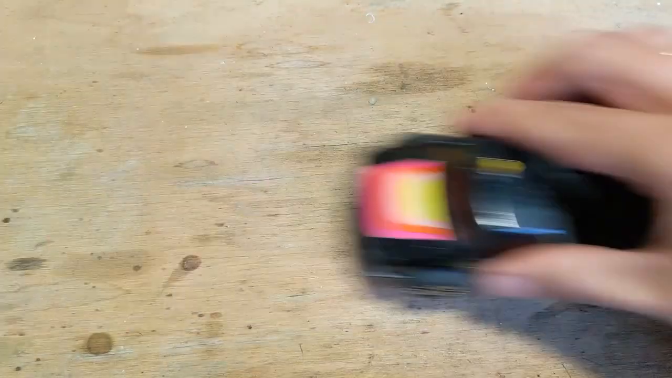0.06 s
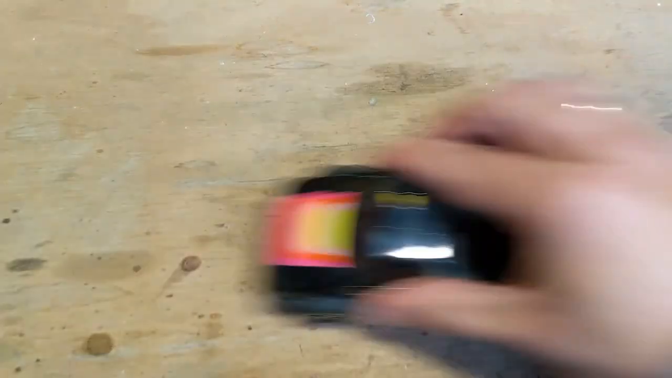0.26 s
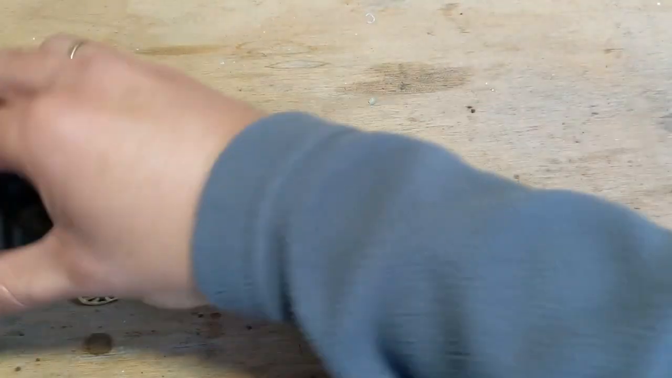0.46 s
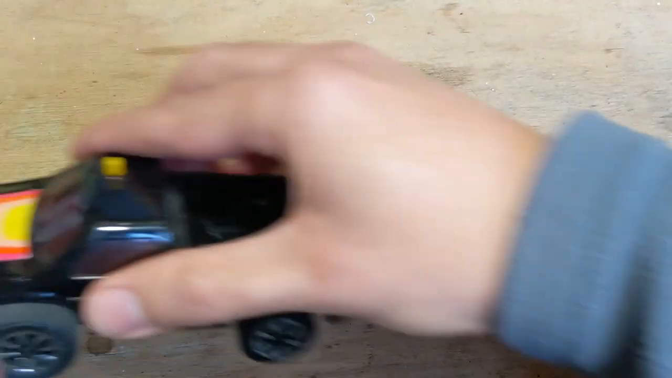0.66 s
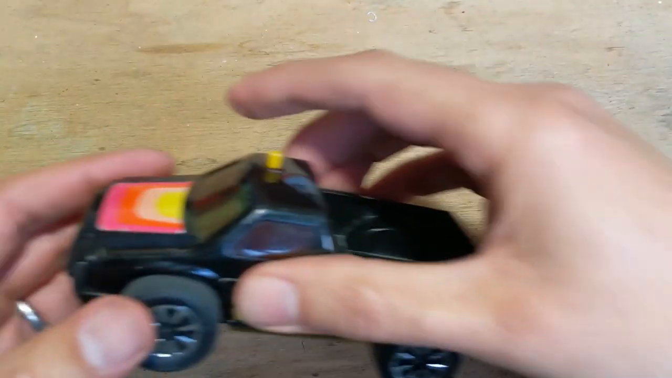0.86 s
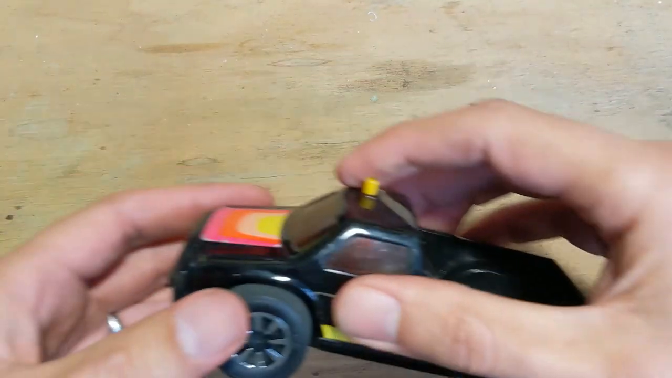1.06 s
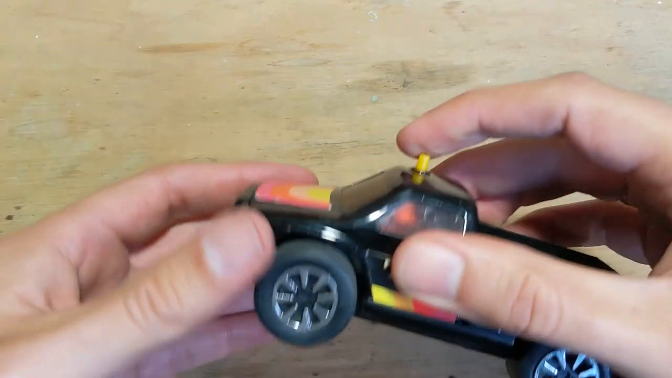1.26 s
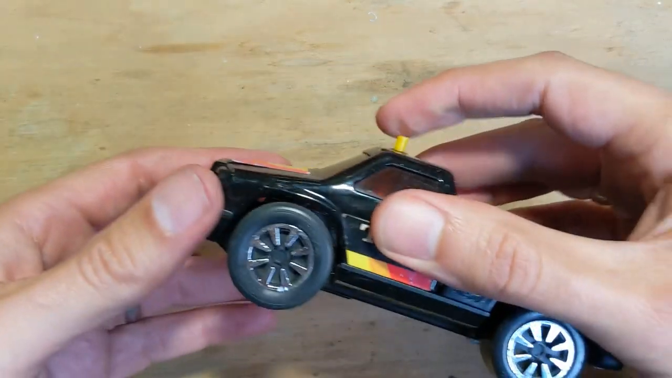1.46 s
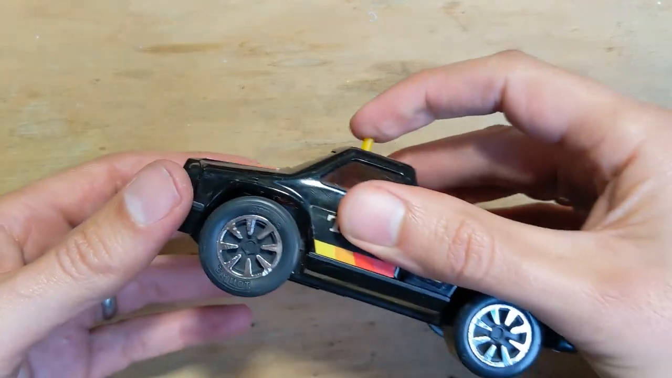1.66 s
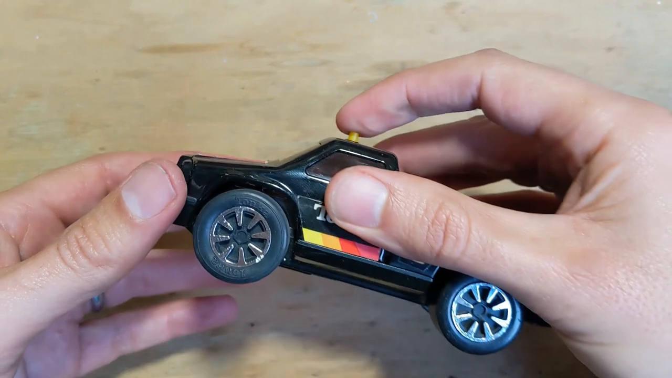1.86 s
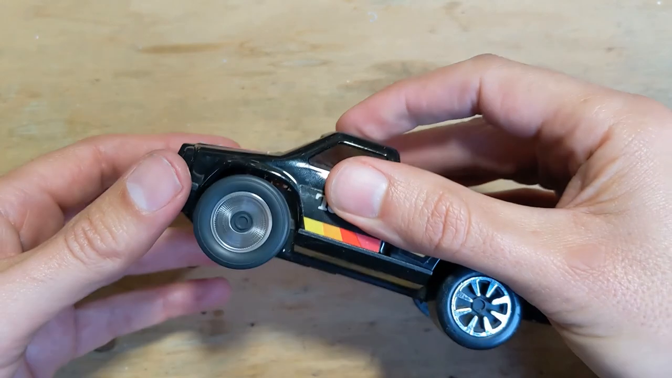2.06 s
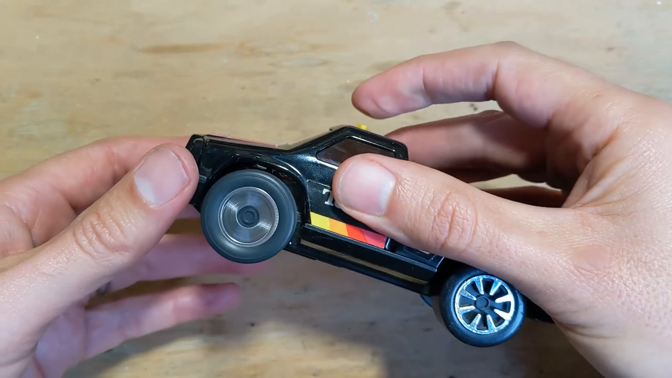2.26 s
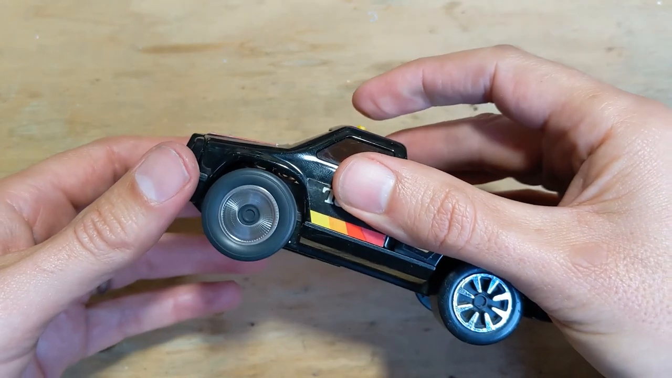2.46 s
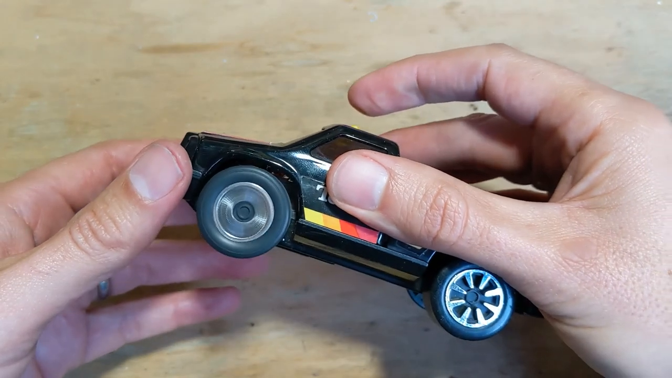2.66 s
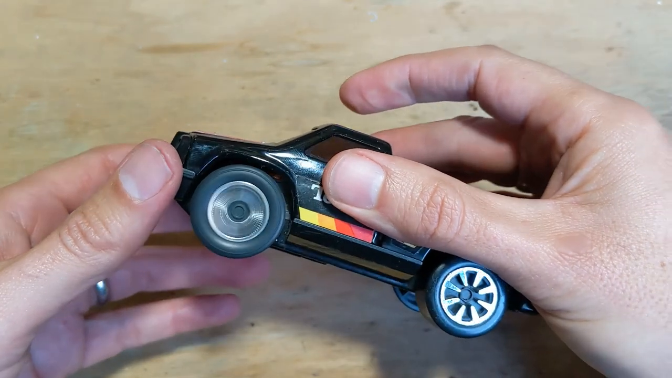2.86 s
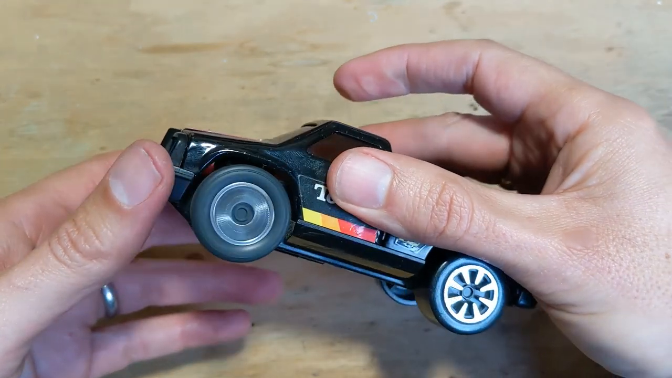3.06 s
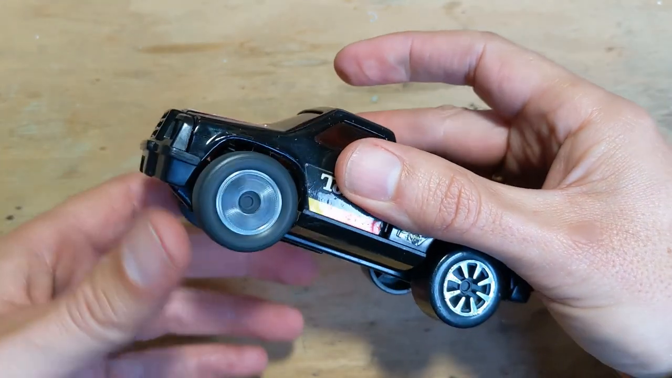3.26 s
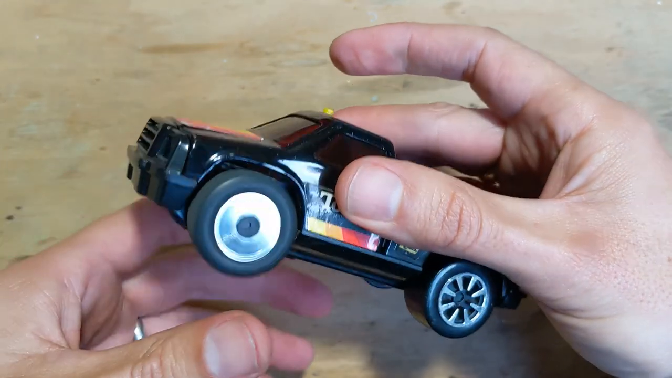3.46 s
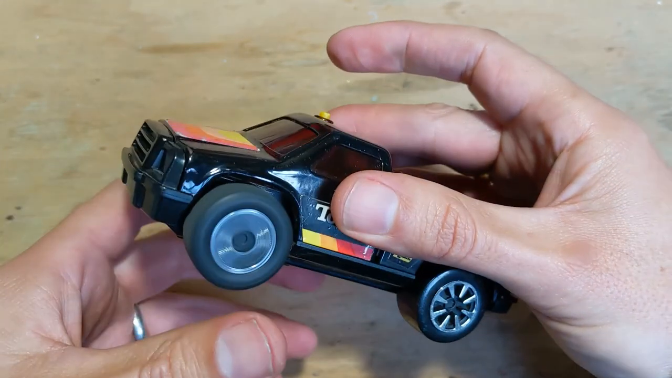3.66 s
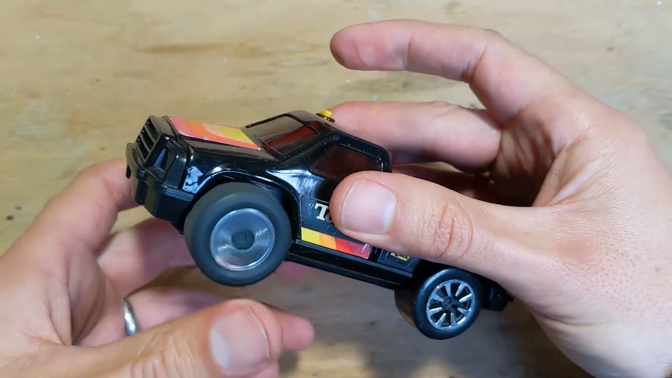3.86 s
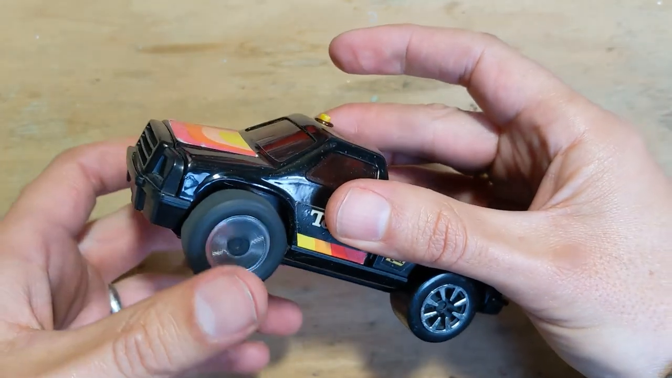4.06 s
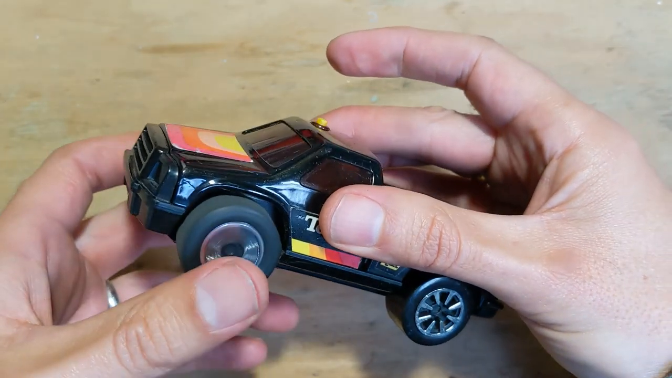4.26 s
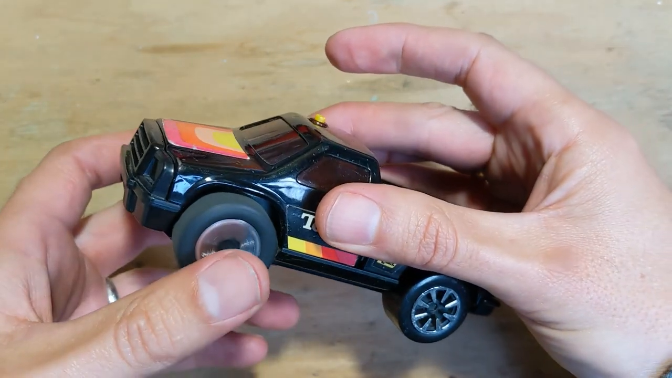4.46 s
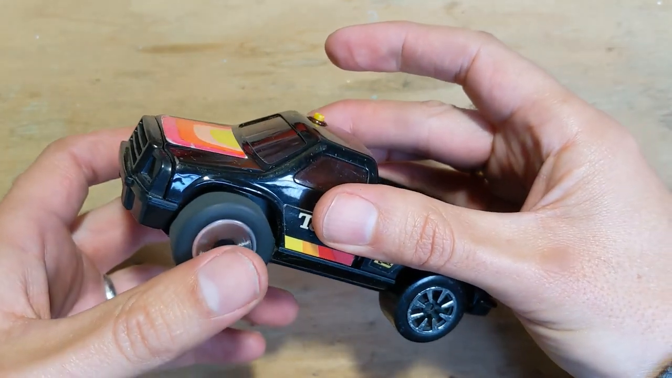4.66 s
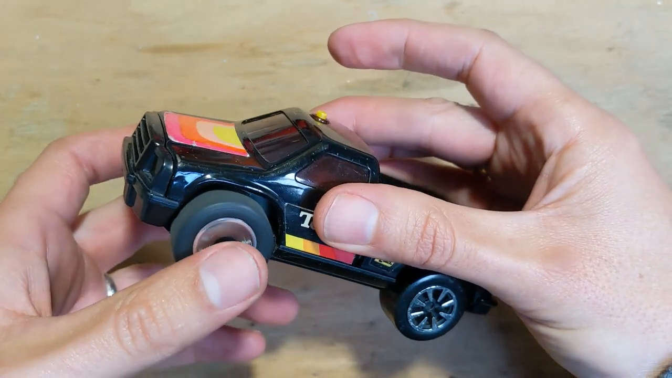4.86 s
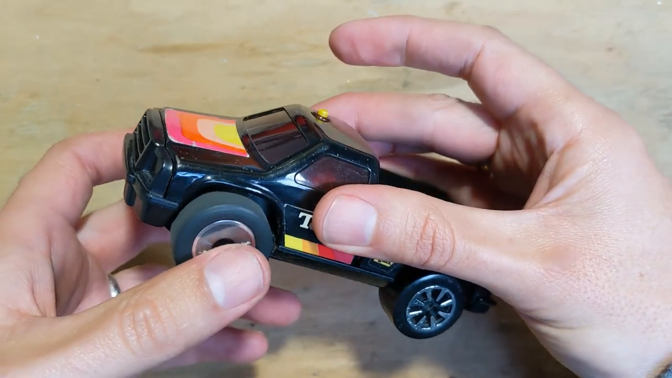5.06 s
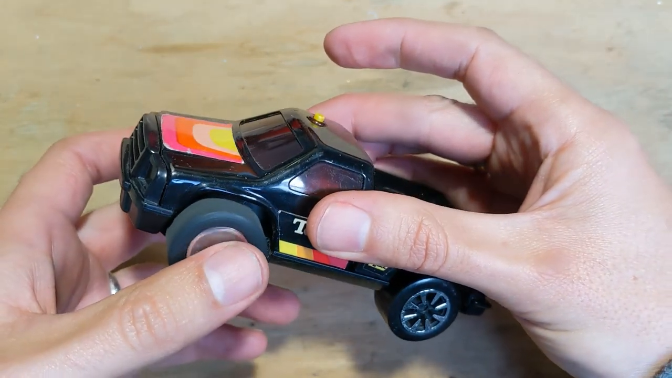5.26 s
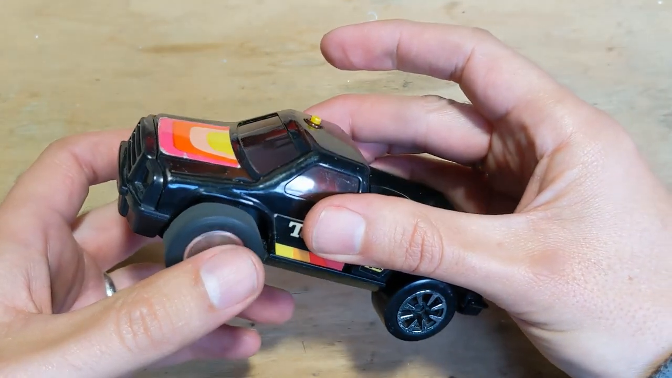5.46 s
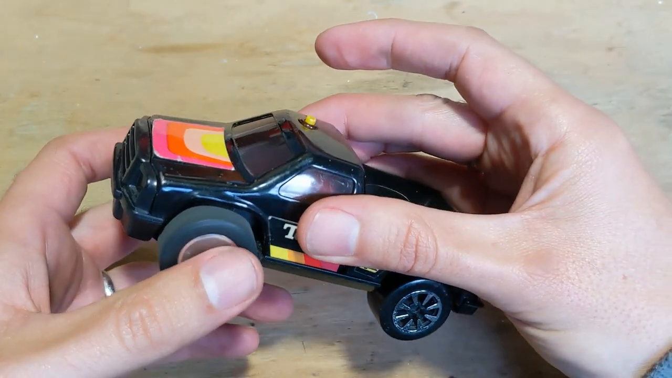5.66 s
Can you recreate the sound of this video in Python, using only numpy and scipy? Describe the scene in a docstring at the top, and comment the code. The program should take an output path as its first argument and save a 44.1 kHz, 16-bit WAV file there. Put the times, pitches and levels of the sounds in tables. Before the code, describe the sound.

A small toy car rattles, clacks onto a wooden bench and scrapes along briefly, then its gears catch into a loud, harsh whine sinking in pitch.

```python
"""A dry rattle opens: a toy flywheel car, its flywheel coasting, is set down on a wooden bench, pushed, lifted.
Then the gears catch: the teeth whine and chatter in the plastic shell, falling in pitch as the flywheel slows.
A thumb on the spinning wheel makes the whine louder and drags it down faster.
Random impacts excite resonant filters (rattle, chatter, knocks, wood); phase-locked sines give the gear tones.
Delayed and scattered copies spread the sound over two ports, above a low rumble and a quiet room."""
import sys
import numpy as np
from scipy import signal
from scipy.fft import rfft, irfft
from scipy.io import wavfile

SR = 44100
rng = np.random.default_rng(int(sys.argv[2]) if len(sys.argv) > 2 else 0)


def to_wav(s):
    """Save 16-bit WAV."""
    ch = np.atleast_2d(s).T  # columns
    pcm = np.round(np.clip(ch, -1, 1) * 32767)  # PCM
    wavfile.write(sys.argv[1], SR, pcm.astype(np.int16))


N = 251766
TIME = np.arange(N) / SR
TAPS = 4096  # length of the colouring filters
FREQS = np.fft.rfftfreq(TAPS, 1 / SR)
EDGE_HZ = 15900  # upper edge of the band
# the gears catch, then spin up to their top tooth rate
CATCH_S, SPIN_FROM_S, SPIN_UP_S, TOP_HZ = 2.08, 2.102, 0.08, 3256
SPUN_S = SPIN_FROM_S + SPIN_UP_S

# the wheels landing on the bench: t/s, level/dB, 60 dB decay time/s, dullness corner f/Hz
LANDINGS = [(0.2406, -15.5, 0.17, 1300), (0.2836, -8.5, 0.056, 2000), (0.2872, -6.5, 0.079, 5000),
            (0.301, -18.5, 0.2, 4000)]
# a thumb brakes the spinning wheel and loads the teeth: t/s, pressure/1
THUMB = [(4.17, 0), (5.12, .6), (5.25, 1), (5.38, .8)]
TOUCH_S = THUMB[0][0]


def amp(db):
    """Decibels to amplitude gain: 20 dB for each factor of ten."""
    return 10 ** (np.asarray(db) / 20)


def unit(x):
    """Scales to rms 1."""
    return x / np.sqrt(np.mean(x ** 2) + 1e-20)


def ramp(start_s, length_s):
    """Linear rise from 0 to 1, then steady."""
    return np.clip((TIME - start_s) / length_s, 0, 1)


def curve(rows, column=1):
    """Linear interpolation of one column of a time table at every sample."""
    rows = np.asarray(rows)
    return np.interp(TIME, rows[:, 0], rows[:, column])


def spectrum(rows, column=1):
    """Interpolation of one column of a frequency table on a logarithmic axis."""
    rows = np.asarray(rows)
    return np.interp(np.log(FREQS + 1), np.log(rows[:, 0]), rows[:, column])


def resonance(hz, centre_hz, width_hz):
    """Lorentzian resonance curve: 1 at the centre, one half at half the width to either side."""
    return 1 / (1 + (2 * (hz - centre_hz) / width_hz) ** 2)


def colour(x, db):
    """Minimum-phase filter: the Hilbert transform of the log gain supplies a causal phase."""
    log_gain = np.log(amp(np.r_[db, db[-2:0:-1]]))
    response = np.fft.ifft(np.exp(np.conj(signal.hilbert(log_gain)))).real
    return signal.oaconvolve(x, response)[:N]


def levelled(db, low_hz=0):
    """Power normalisation: white noise of rms 1 leaves with power 1 between low_hz and the band edge."""
    in_band = (FREQS >= low_hz) * (FREQS < EDGE_HZ)
    return db - 10 * np.log10(np.mean(amp(db) ** 2 * in_band))


def wander(hz):
    """Low-passed noise: a smooth random drift of rms 1, mostly slower than hz."""
    smooth = signal.butter(2, hz, fs=SR, output="sos")
    # one second of run-in lets the filter settle
    return unit(signal.sosfilt(smooth, rng.standard_normal(N + SR))[SR:])


def ticks(per_s, spread_db):
    """Random impulse train: tiny impacts of uneven strength and either sign, at rms 1."""
    strength = amp(spread_db * np.clip(rng.standard_normal(N), -2, 2))
    sign = rng.choice([-1, 1], N)
    return unit(strength * sign * (rng.random(N) < per_s / SR))


def echoes(t60):
    """Diffuse reverberation: sparse, exponentially decaying reflections for two ports, each of energy 1."""
    t = TIME[:SR // 2]
    sign = rng.choice([-1, 1], (2, len(t)))
    present = rng.random((2, len(t))) < .12
    taps = sign * present * amp(-60 * t / t60) * (t > .0007)
    return taps / np.linalg.norm(taps, axis=1, keepdims=True)


def scatter(x, t60, drift_hz, count=6):
    """Time-varying scattering: the mix of reflections keeps changing as the hands and the car move."""
    shares = np.array([wander(drift_hz) for _ in range(count)])
    shares = shares / np.linalg.norm(shares, axis=0)
    return sum(signal.oaconvolve((x * share)[None], echoes(t60), axes=1)[:, :N] for share in shares)


def ports(x, lag_s=0.00012):
    """Interaural-style delay: a linear phase slope makes the direct sound reach the left port first."""
    hz = np.fft.rfftfreq(2 * N, 1 / SR)
    late = irfft(rfft(x, 2 * N) * np.exp(-2j * np.pi * hz * lag_s))[:N]
    return np.array([x, late])


def handling(held_db=-55, contact_db=-35, fade_db_per_s=31, jolt_db=-50, jolt_t60=.5, lifted_db=-22):
    """Structure-borne rumble strength: hand's swing, wheels on the bench until lift-off, jolt at the catch."""
    lift_s, lift_length_s = 0.86, 0.35
    landed_s = LANDINGS[0][0]
    contact = ramp(landed_s, .03) * amp(contact_db - fade_db_per_s * (TIME - landed_s))
    jolt = (TIME > CATCH_S) * amp(jolt_db - 60 * abs(TIME - CATCH_S) / jolt_t60)
    return (amp(held_db) + contact) * amp(lifted_db * ramp(lift_s, lift_length_s)) + jolt


def background(room_tone_db=-63, apart_db=-10):
    """Partly coherent noise: low rumble of handling over a quiet room, nearly alike at both ports."""
    # spectrum of the rumble: f/Hz, relative level/dB
    rumble_colour = [(20, 8.5), (28, -3), (45, -15), (80, -4), (115, 1.5), (150, -8), (250, -23),
                     (500, -74)]
    # spectrum of the quiet room: f/Hz, relative level/dB
    room_colour = [(20, -6.5), (45, -2.5), (75, 0), (110, -16.5), (160, -15), (300, -14.5), (700, -21),
                   (2000, -32), (16000, -39)]
    shared = rng.standard_normal((2, 1, N))
    separate = rng.standard_normal((2, 2, N))
    noise = shared + amp(apart_db) * separate
    rumble = np.array([colour(port, levelled(spectrum(rumble_colour))) for port in noise[0]])
    room = np.array([colour(port, levelled(spectrum(room_colour))) for port in noise[1]])
    return rumble * handling() + room * amp(room_tone_db)


def rolling():
    """Envelope of rolling friction: the wheels bite, hold, then fade exponentially."""
    push_s, attack_s, hold_s, fade_db_per_s = 0.337, 0.021, 0.061, 121
    return ramp(push_s, attack_s) * amp(-fade_db_per_s * np.maximum(TIME - push_s - hold_s, 0))


def bench(ring_db=6, roll_db=-14.0, board_hz=219, board_t60=0.28, board_db=-27, wet_db=-7):
    """Impact and roughness excitation: wheels land and roll over the grain, ringing the board and the car."""
    # modes of wood and car: f/Hz, width/Hz, prominence/dB (its fourth root in power scales ring_db)
    bench_modes = [(210, 21, -3), (1010, 150, -1), (1610, 48, -3), (2115, 52, 4), (2630, 65, -17),
                   (3400, 260, 2)]
    # spectrum of the rolling: f/Hz, relative level/dB
    roll_colour = [(24, -43), (40, -18), (135, -19.5), (216, -6.5), (313, -3.5), (478, -15), (527, -8),
                   (933, -13.5), (1420, -19.5), (3220, -4), (4790, -12), (7490, -13.5), (8690, -20),
                   (15000, -15.5)]
    # spectrum of the landings: f/Hz, relative level/dB
    landing_colour = [(24, -44), (40, -14), (216, -7.5), (824, -4.5), (1000, -7), (1490, -11.5),
                      (1610, -6.5), (2640, -5), (2850, -12), (3470, -2.5), (5040, -8.5), (5850, -7.5),
                      (6950, -18.5), (15000, -16)]
    modes = sum(ring_db * amp(db / 2) * resonance(FREQS, hz, width) for hz, width, db in bench_modes)
    grain = ticks(per_s=4400, spread_db=3.5) * amp(roll_db) * rolling()
    out = colour(grain, levelled(spectrum(roll_colour) + modes))
    for start_s, db, t60, corner_hz in LANDINGS:
        age = np.maximum(TIME - start_s, 0)
        decay = amp(db - 60 * age / t60) * (TIME >= start_s)
        blow = decay * ticks(per_s=9200, spread_db=3.5)
        soft_db = 10 * np.log10(.15 + 1 / (1 + (FREQS / corner_hz) ** 2))
        out += colour(blow, levelled(spectrum(landing_colour) + modes + soft_db))
        # the board's lowest mode
        out += amp(board_db - 60 * age / board_t60) * np.sin(2 * np.pi * board_hz * age)
    return ports(out) + amp(wet_db) * scatter(out, t60=0.25, drift_hz=7.4)


def shell(column):
    """Modal response: gain of the shell in dB, coasting (column 1), in the first grip (2) or the second (3)."""
    # resonances of the plastic shell: f/Hz, width/Hz, coasting/dB, first grip/dB, second grip/dB
    shell_modes = [(1287, 244, 5.5, 12, 12), (1650, 160, 5.5, 10, 4), (1855, 63, 9.5, 7, 7),
                   (2710, 700, -3.6, 1.5, 0), (3195, 270, 5, 8, 1.5), (3836, 740, 2.5, 0.5, 6.5),
                   (4030, 350, -2.5, 5, 0.5), (5365, 780, 3, 5, 12.5), (5780, 630, 3, 2.5, 1),
                   (7100, 1600, 2.5, 4.5, 2.5), (7600, 440, 5, 1.5, 2), (9510, 740, 6, 2, 5),
                   (10100, 580, 4.5, 4, 2.5), (11760, 700, 3.5, 6.5, 6.5), (14200, 3600, 2, 1, 1.4)]
    # broad colour under those resonances: f/Hz, coasting/dB, first grip/dB, second grip/dB
    body_colour = [(40.0, -44, -55, -29), (148, -19, -32.5, -39), (340, -16, -22, -26.5),
                   (735, -10, -26.5, -20.5), (1090, -0.1, -12, -13), (1840, -3.5, -7.5, -6.5),
                   (1950, -3.5, -11.5, -6.5), (2860, 3, -4, -7.5), (4900, -3.5, 0, -6.5),
                   (8340, -7.5, -4.5, -2.5), (12900, -6, -5.5, -5.5), (15730, -6.5, 0, 0)]
    modes = sum(row[column + 1] * resonance(FREQS, row[0], row[1]) for row in shell_modes)
    return spectrum(body_colour, column=column) + modes


def knocks():
    """Impulsive excitation: loose plastic parts clack against the shell, each knock decaying exponentially."""
    # plastic knocks in the car, the last as the gears catch: t/s, level/dB, 60 dB decay time/s
    knock_times = [(0.518, -21, 0.082), (0.857, -39, .03), (0.978, -32, 0.037), (1.004, -22.5, .03),
                   (1.537, -32, 0.026), (2.014, -27, 0.089), (2.085, -12.5, 0.13)]
    burst = np.zeros(N)
    for start_s, db, t60 in knock_times:
        burst += amp(db - 60 * np.maximum(TIME - start_s, 0) / t60) * (TIME >= start_s)
    return colour(burst * ticks(per_s=7200, spread_db=4.5), levelled(shell(column=1)))


def coasting(rattle_trim_db=2, hum_trim_db=1, flutter_db=1.37, flutter_hz=14):
    """Random bearing impacts: the free flywheel rattles, humming in the shell, until the gears catch."""
    # the flywheel running free: t/s, rattle level before trim/dB, low hum level before trim/dB
    coast_levels = [(0, -32.5, -40), (.18, -34.5, -36.5), (.62, -33, -42), (.82, -33.5, -37),
                    (1.08, -33, -36), (1.25, -34, -37.5), (1.57, -34, -36.5), (1.75, -36.5, -43),
                    (2.06, -35, -41.5)]
    sway = amp(flutter_db * wander(flutter_hz)) * (1 - ramp(CATCH_S, SPIN_UP_S))
    low = 1 / (1 + (FREQS / 2200) ** 8)  # hum below the crossover, rattle above
    rattle_gain = levelled(shell(column=1) + 10 * np.log10(1.001 - low))
    hum_gain = levelled(shell(column=1) + 10 * np.log10(.001 + low))
    rattle = ticks(per_s=8000, spread_db=0.5) * sway * amp(curve(coast_levels, column=1) + rattle_trim_db)
    hum = ticks(per_s=4700, spread_db=4) * sway * amp(curve(coast_levels, column=2) + hum_trim_db)
    return colour(rattle, rattle_gain) + colour(hum, hum_gain)


def tooth_rate():
    """Teeth per second: a quick spin-up, an exponential run-down, and the thumb's braking on top."""
    catch_hz, run_down_s = 800, 4.3
    brake_hz_per_s = 750  # at full thumb pressure
    spun = catch_hz + (TOP_HZ - catch_hz) * ramp(SPIN_FROM_S, SPIN_UP_S)
    age = np.maximum(TIME - SPUN_S, 0)
    return spun * np.exp(-age / run_down_s) - brake_hz_per_s * np.cumsum(curve(THUMB)) / SR


def octaves_down():
    """Logarithmic speed: how far the gears have slowed from their top speed."""
    return np.log2(TOP_HZ / tooth_rate()) * (TIME > SPUN_S)


def surge(settle_s):
    """Exponential relaxation: the extra load on the teeth when they catch, 1 at first and dying away."""
    return np.exp(-np.maximum(TIME - SPUN_S, 0) / settle_s)


def mesh_turns():
    """Phase modulation: teeth passed, jittered by backlash and swung once a turn by an off-centre pinion."""
    pinion_teeth = 14
    eccentric, slack, slack_hz = .02, .034, 50  # swing and jitter in teeth
    turns = np.cumsum(tooth_rate()) / SR
    swing = eccentric * np.sin(2 * np.pi * turns / pinion_teeth)
    return turns + slack * wander(slack_hz) + swing


def bouncing():
    """Subharmonic strength: strong and weak strikes alternate only at high speed."""
    return np.interp(tooth_rate(), [2000, 2100, 2900, 3200], [0, .9, 1, 1.4])


def housing(hz):
    """Modal response: gain of the gear housing in dB."""
    # resonances of the gear housing: f/Hz, width/Hz, peak gain/dB
    housing_modes = [(3050, 400, -5), (3850, 500, 5), (4600, 450, -5), (5450, 800, 2.5), (10000, 1200, 1.5)]
    return sum(peak_db * resonance(hz, centre, width) for centre, width, peak_db in housing_modes)


def overtones(turns, db_per_octave=-3, thumb_db=4):
    """Source and filter: mesh multiples swell and fade through the housing; speed and load firm them."""
    # overtones of the mesh: multiple of the tooth rate/1
    multiples = [1.5, 2, 2.5, 3, 4, 5, 6, 7, 8, 9]
    # the same overtones: relative level/dB
    overtone_levels = [-16.5, -16.5, -18, -17.5, -17.5, -16, -15, -15, -18, -19.5]
    flutter_db, flutter_hz, top_hz = 2, 10, 11500
    rate = tooth_rate()
    tones = np.zeros(N)
    for k, db in zip(multiples, overtone_levels):
        height = amp(db + housing(k * rate) + flutter_db * wander(flutter_hz))
        if k % 1:  # half multiples need alternating strikes
            height = height * bouncing()
        height = height / np.sqrt(1 + (k * rate / top_hz) ** 12) * (k * rate < SR / 2)
        tones += height * np.sqrt(2) * np.cos(2 * np.pi * (k * turns + rng.random()))
    return tones * amp(db_per_octave * octaves_down() + thumb_db * curve(THUMB))


def chatter(turns, level_db=-15.0, db_per_octave=-9.0, thumb_db=8, attack_s=0.063, flutter_db=1.24,
            bunching=0.24):
    """Repeated impact: teeth strike and rebound, harder with speed and load, and ring the shell."""
    # the fingers shift from the first grip, already partly like the second, to the second
    regrip_s, regrip_length_s, second_at_first = 2.96, 0.81, 0.17
    clicks = unit(ticks(per_s=15000, spread_db=2.0) * (1 + bunching * np.cos(2 * np.pi * turns)))
    force_db = level_db + db_per_octave * octaves_down() + thumb_db * curve(THUMB) + flutter_db * wander(32)
    drive = (clicks + overtones(turns)) * amp(force_db) * ramp(CATCH_S, attack_s)
    second = second_at_first + (1 - second_at_first) * ramp(regrip_s, regrip_length_s)
    first_grip = colour(drive, levelled(shell(column=2), low_hz=2300))
    second_grip = colour(drive, levelled(shell(column=3), low_hz=2300))
    return (1 - second) * first_grip + second * second_grip


def bounce_tone(turns, level_db=-28.0, db_per_octave=-15, flutter_db=2.0, ring_db=5, ring_width_hz=70):
    """Period doubling: every other tooth hits harder, a hoarse octave below that swells on a shell resonance."""
    slip, slip_hz, ring_hz = .16, 45, 1285
    rate = tooth_rate()
    lost_step = slip * (rate / TOP_HZ) ** 2 * wander(slip_hz)  # greater at high speed
    tone = np.sqrt(2) * np.cos(2 * np.pi * (turns / 2 + lost_step)) * bouncing()
    swell_db = ring_db * resonance(rate / 2, ring_hz, ring_width_hz)
    tone = tone * amp(level_db + db_per_octave * octaves_down() + swell_db + flutter_db * wander(97))
    return signal.sosfilt(signal.butter(4, [950, 2000], "band", fs=SR, output="sos"), tone)


def loaded_overtones(turns, ring=1.54, flutter_db=2.5, seat_s=0.021):
    """Harmonics under load: once the thumb takes up the slack, low overtones sing straight from the housing."""
    # overtones that sing under the thumb: multiple of the tooth rate/1, level before the housing/dB
    singing = [(2, -34), (3, -38), (4, -41), (5, -48)]
    rate = tooth_rate()
    tones = np.zeros(N)
    for k, db in singing:
        height = amp(db + ring * housing(k * rate) + flutter_db * wander(35))
        tones += height * np.sqrt(2) * np.cos(2 * np.pi * (k * turns + rng.random()))
    return tones * ramp(TOUCH_S, seat_s)


def radiate(x, near_db=-3, room_db=-9, near_t60=0.058, room_t60=1.0):
    """Directivity: the shell beams unevenly; bench and hands scatter its treble, and the room rings faintly."""
    # level difference between the ports: f/Hz, left minus right/dB
    left_lead = [(100, -12.5), (250, 8.5), (500, 11.5), (900, 5), (1400, 4.5), (2600, 0.5), (3200, 2),
                 (4800, -2), (6200, 2), (9000, 1), (12000, 4), (15000, 4)]
    treble = colour(x, spectrum([(700, -18.5), (1400, 1.5), (2800, 0), (16000, 2.5)]))
    direct = colour(x, spectrum([(1400, -2), (2800, -6.0), (16000, -7.5)]))
    near = amp(near_db) * scatter(treble, near_t60, drift_hz=7)
    room = amp(room_db) * scatter(x, room_t60, drift_hz=7.6)
    wet = signal.sosfilt(signal.butter(4, 850, "high", fs=SR, output="sos"), near + room)
    left, right = ports(direct) + wet
    lead = spectrum(left_lead)
    return np.array([colour(left, lead / 2), colour(right, -lead / 2)])


def whine(turns, level_db=-31, surge_db=10, settle_s=.5, seated_db=5, thumb_db=8, ripple_db=4, left_db=1,
          thumb_left_db=6, sway_db=4, cut_hz=1200):
    """Interference: the clear line at the tooth rate, louder under load, beats with its own reflections."""
    beating_db, flutter_db, flutter_hz, echo_s = -8, 1.8, 22, 0.00351
    slipping_db, seat_s = -7, .03
    thumb = curve(THUMB)
    # the teeth skid during the spin-up
    slipping = ramp(SPIN_FROM_S, SPIN_UP_S) - ramp(SPUN_S, seat_s)
    seating = amp(slipping_db * slipping) * (TIME > SPIN_FROM_S)
    # the thumb's first touch takes up the slack
    seated = ramp(TOUCH_S, 0.27)
    load_db = level_db + surge_db * surge(settle_s) + seated_db * seated + thumb_db * thumb
    # one echo cancels and adds in turn as the pitch falls
    comb_db = -ripple_db * np.cos(2 * np.pi * tooth_rate() * echo_s) * (1 - seated) * (1 - surge(settle_s))
    tone = np.sqrt(2) * np.cos(2 * np.pi * turns) * seating
    tone = tone * amp(load_db + comb_db + flutter_db * wander(flutter_hz))
    balance_db = left_db + thumb_left_db * thumb + sway_db * wander(7.2)  # left minus right
    sides = amp(np.array([[.5], [-.5]]) * balance_db)
    both = ports(tone) + amp(beating_db) * scatter(tone, t60=0.079, drift_hz=17.5)
    both = both * sides / np.sqrt(np.mean(sides ** 2, axis=0))
    # a small shell radiates no bass
    return signal.sosfilt(signal.butter(6, cut_hz, "high", fs=SR, output="sos"), both)


def scene():
    """Superposition: the car close to the microphone, over the bench and the background."""
    turns = mesh_turns()
    car = coasting() + knocks() + chatter(turns) + bounce_tone(turns) + loaded_overtones(turns)
    return background() + bench() + radiate(car) + whine(turns)


def record(dry):
    """Soft saturation and band limiting: the recorder rounds off the very highest peaks, then cuts the top."""
    ceiling, knee = .88, 8
    held = dry / (1 + abs(dry / ceiling) ** knee) ** (1 / knee)
    low_pass = signal.firwin(511, EDGE_HZ, window=("kaiser", 9), fs=SR)
    return signal.oaconvolve(held, low_pass[None], "same")


dry = scene()
out = record(dry)
to_wav(out)
```